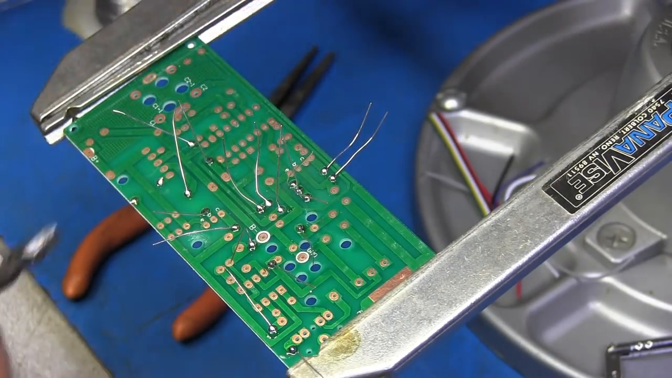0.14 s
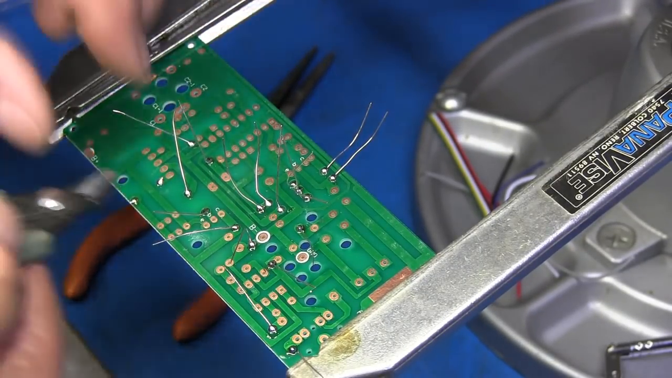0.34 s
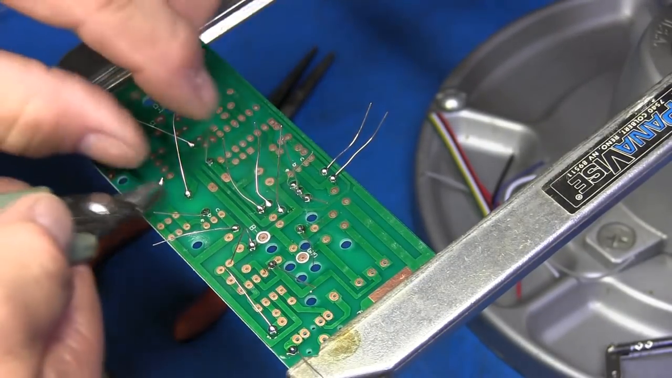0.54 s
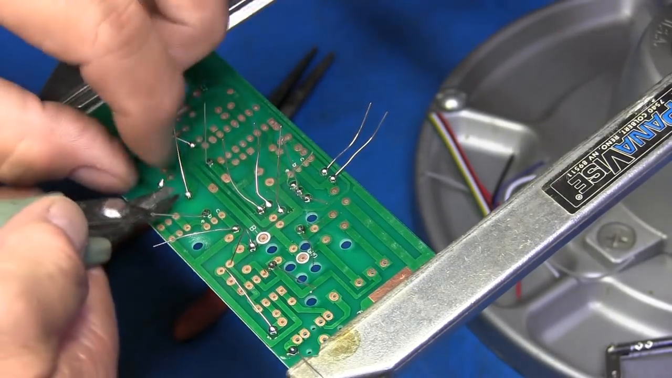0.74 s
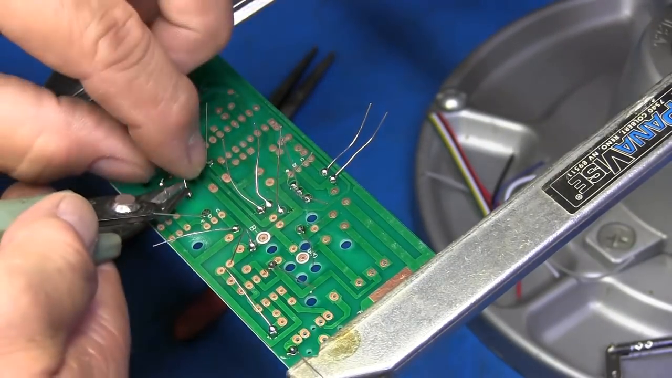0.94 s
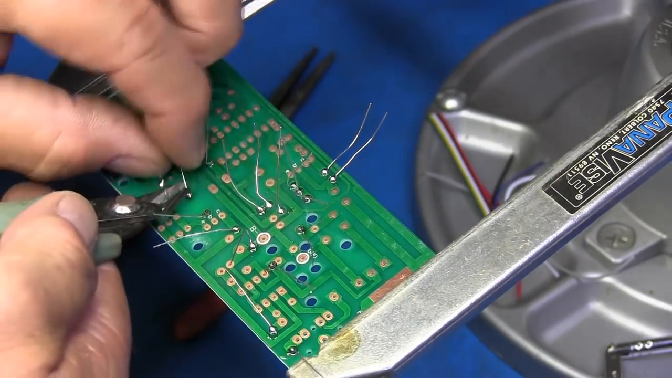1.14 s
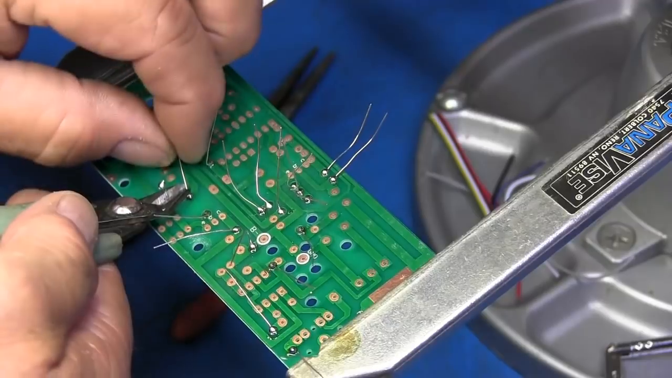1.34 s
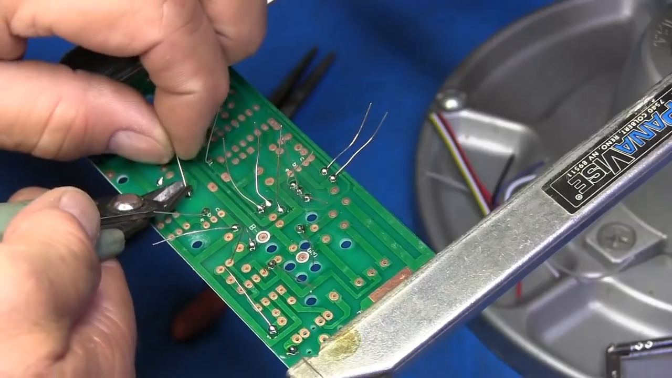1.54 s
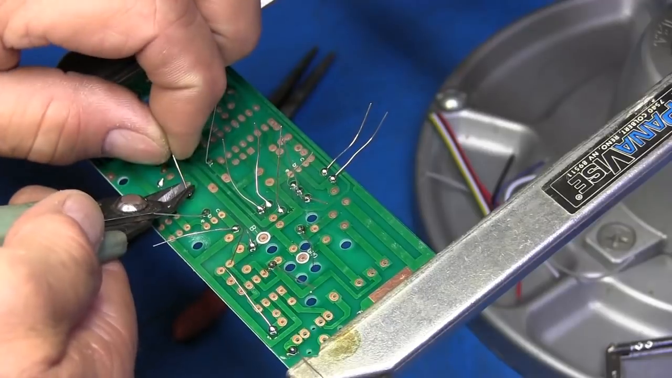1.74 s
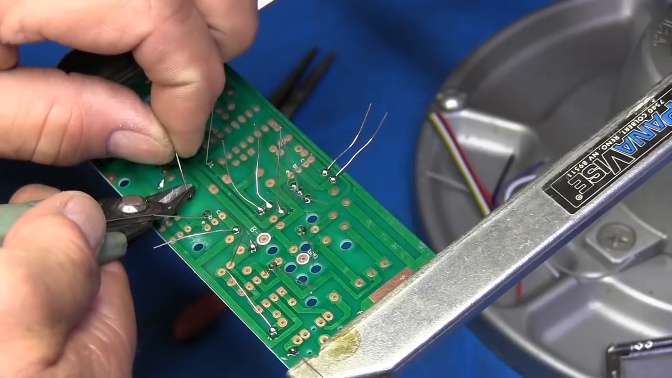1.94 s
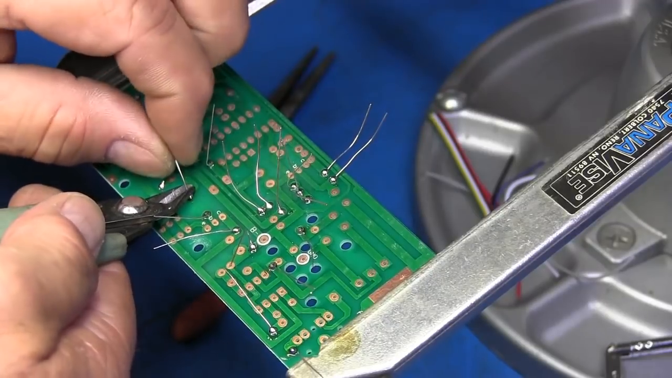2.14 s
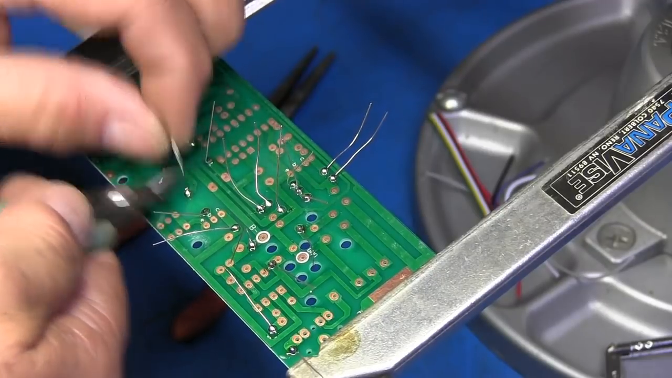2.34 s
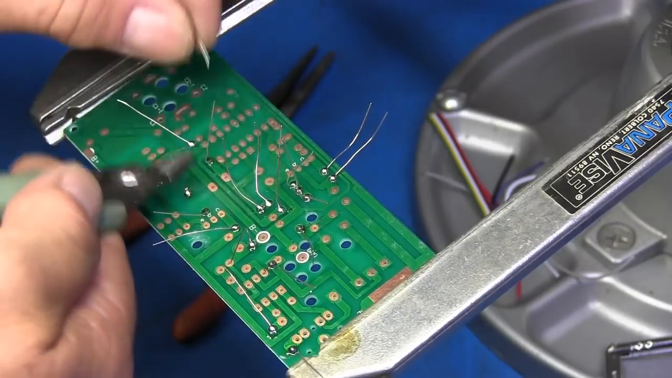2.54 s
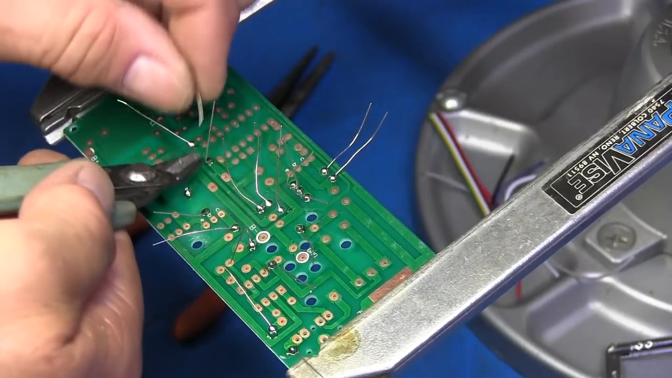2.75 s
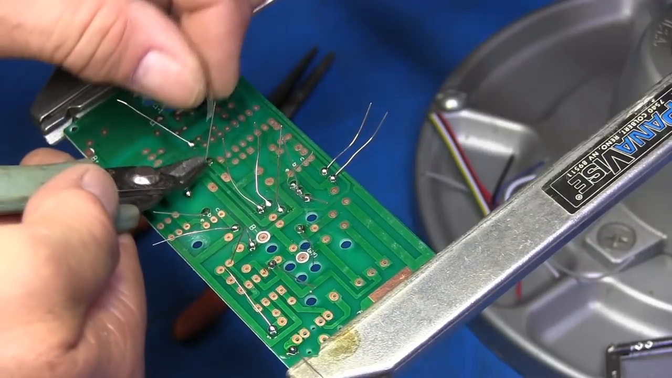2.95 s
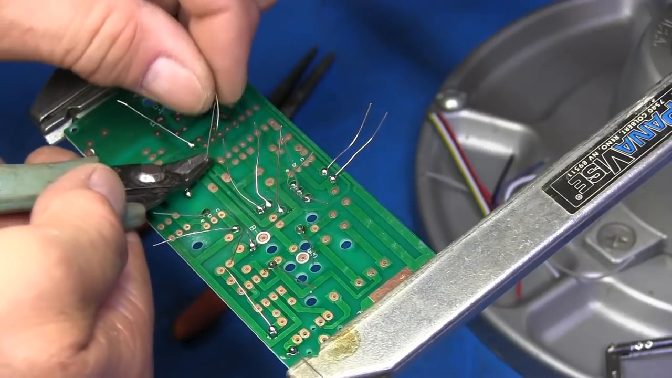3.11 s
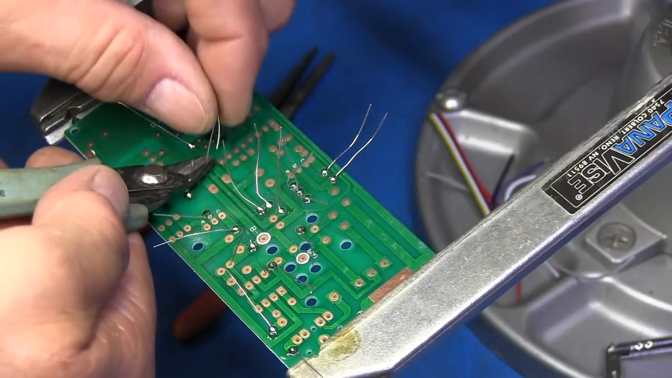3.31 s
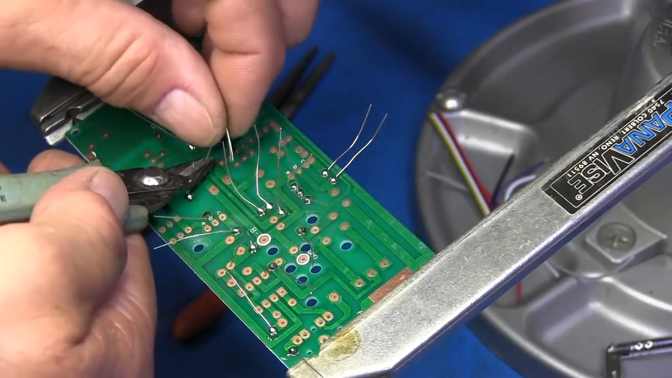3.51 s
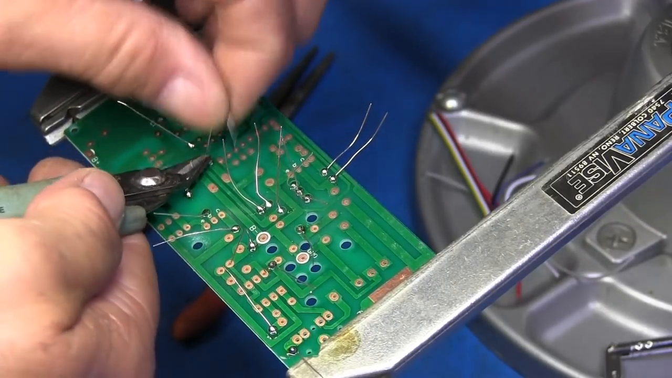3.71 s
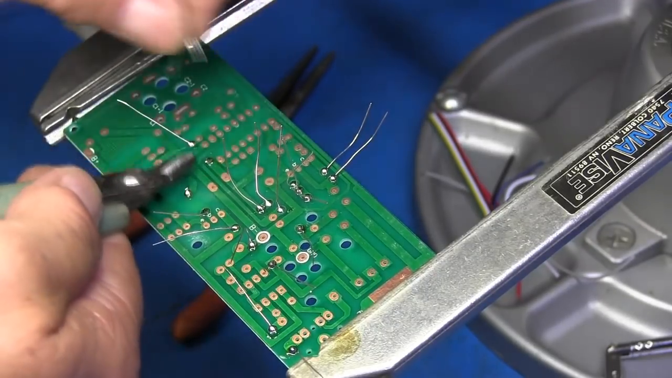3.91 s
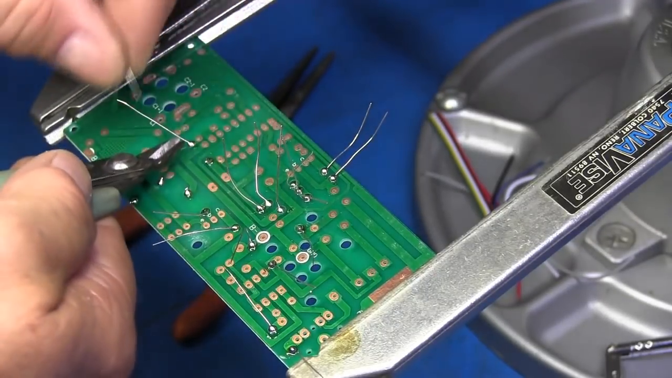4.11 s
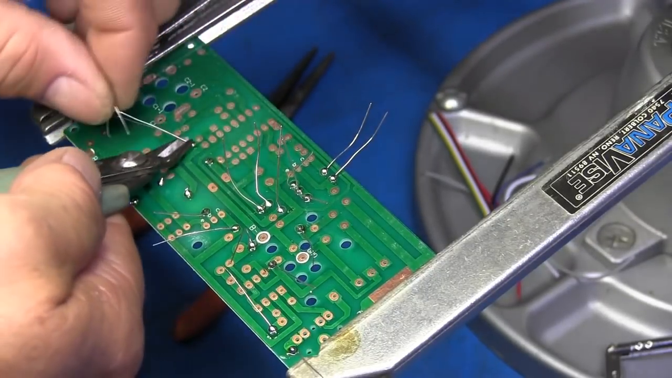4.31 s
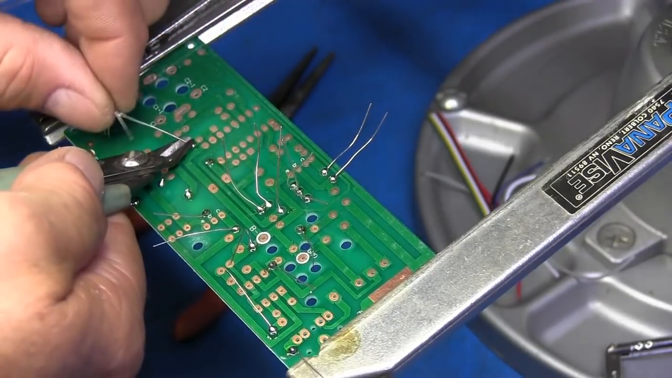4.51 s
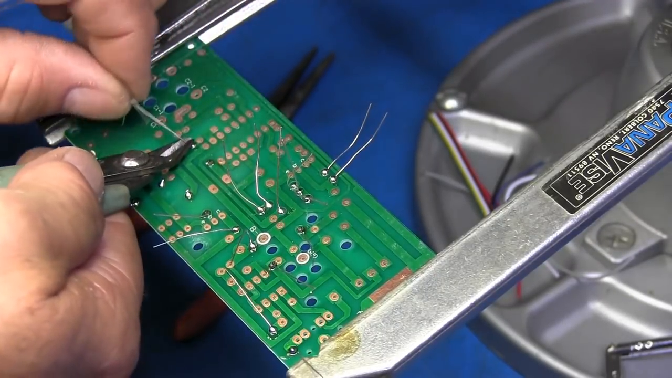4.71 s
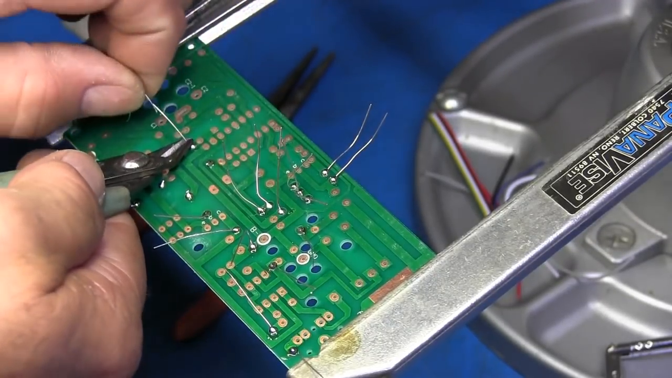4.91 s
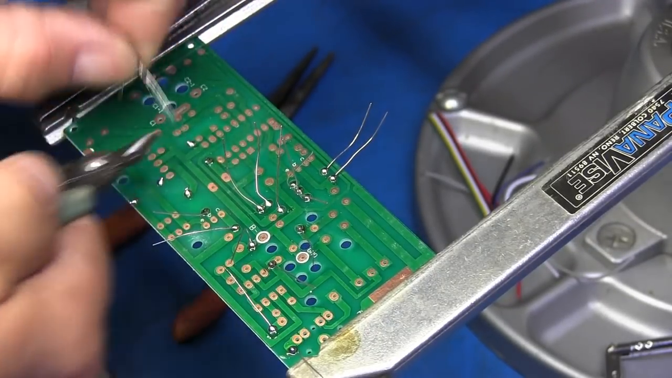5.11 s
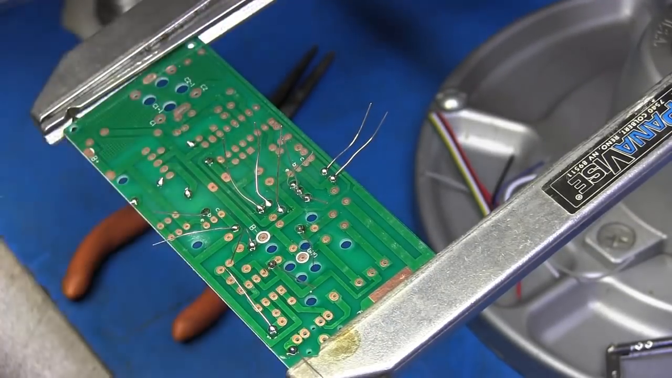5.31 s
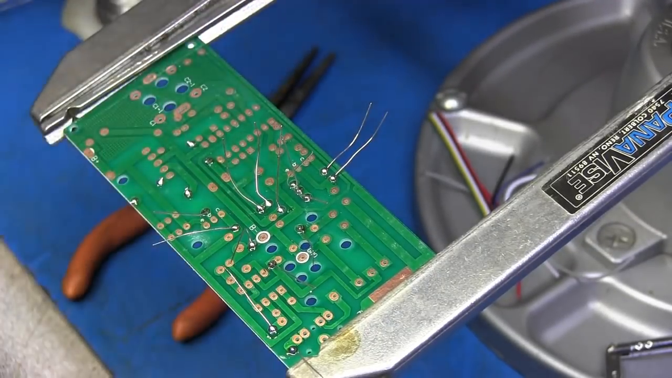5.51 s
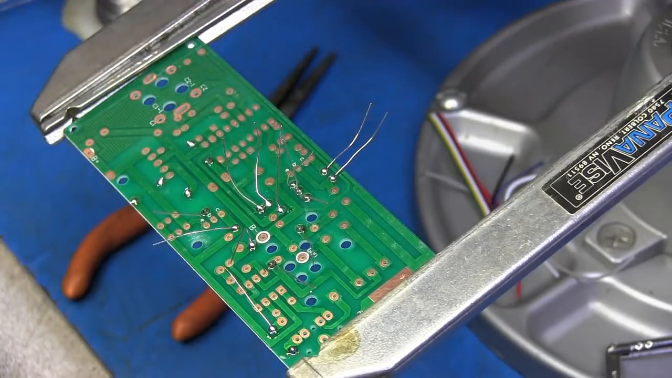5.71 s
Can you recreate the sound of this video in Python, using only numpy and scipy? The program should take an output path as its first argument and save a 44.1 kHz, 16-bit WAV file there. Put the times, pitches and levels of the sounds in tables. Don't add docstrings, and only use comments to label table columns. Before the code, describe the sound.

Small cutters tick and knock against a circuit board, then snip two wire leads with sharp metallic cracks over quiet fan air.

```python
import sys
import numpy as np
from scipy import signal
from scipy.fft import rfft, irfft
from scipy.io import wavfile

SR = 44100
rng = np.random.default_rng(int(sys.argv[2]) if len(sys.argv) > 2 else 0)


def master_out(mix):
    frames = np.transpose(np.atleast_2d(mix))
    ceiling = np.clip(frames, -1, 1)
    pcm = np.round(ceiling * 32767).astype(np.int16)
    wavfile.write(sys.argv[1], SR, pcm)


def boost_factor(decibels):
    exponent = np.asarray(decibels, float) / 20
    return 10 ** exponent


N = 258426

# pitch_hz, level_db (per Hz)
AIR = [(15, -41), (25, -21.5), (144, -9.5), (275, -4), (688, -15.5), (1310, -15), (4500, -32),
       (15700, -46.5)]
AIR_DB = -39.5
# pitch_hz, width_hz, level_db
DUCTS = [(179.5, 47, 5.5), (285, 40, 2), (307, 22, -2.5), (342, 20, 7.5), (388, 23, -3.5), (424, 37, 4),
         (552, 32, 5.5), (604, 16, 3.5), (802, 46, 5.5), (887, 42, 10.5), (946, 50, -3), (1066, 55, 5.5),
         (1234, 100, -3.5)]
# pitch_hz, likeness_0_to_1
LIKENESS = [(60, 0.7), (130, 0.98), (290, 0.92), (640, 0.73), (1410, 0.63), (3100, 0.51), (6820, 0.73),
            (15000, 0.97)]
# pitch_hz, left_minus_right_db
BALANCE = [(60, -5.5), (200, -2.0), (380, 0.5), (700, 1), (1290, -1), (2380, 0.5), (5500, -0.7),
           (15000, 3.5)]
# pitch_hz, lead_radians
PORT_LEAD = [(60, 0.099), (700, 0.22), (2000, 0.026), (6000, .05), (16000, 0.034)]
# pitch_hz, level_db (rms), width_hz, left_minus_right_db
HUM = [
    (36, -58, 0.72, -1),
    (59.3, -59, 0.61, -1),
    (118.4, -59.5, 1.1, 0),
    (872, -53, 1.1, 0),
    (895, -57, 5.3, 6),
]
# start_s, end_s, pitch_hz, level_db (rms)
WHINE = (3.52, 5.65, 13184, -76)
# time_s, level_db (rms)
CLOTH = [
    (0, -71),
    (.48, -66),
    (.62, -95),
    (5.15, -95),
    (5.27, -62),
    (5.4, -64),
    (5.55, -61),
    (5.65, -72),
    (5.72, -90),
]
# start_s, knock_db, knock_hz, wire_db, wire_hz
TICKS = [(0.502, -45, 2770, -55.5, 8070), (0.781, -50, 2410, -56, 6250), (0.9322, -43, 2500, -61, 13500),
         (1.0544, -56, 2430, -56, 6840), (1.2096, -47, 3090, -53, 7020), (1.2424, -46, 2590, -55, 8060),
         (1.4571, -45, 3080, -61, 6080), (1.481, -39.5, 3070, -53, 6600), (2.2722, -42, 3710, -54, 7730),
         (2.477, -55, 2710, -52, 7900), (2.9992, -49, 2920, -53, 8060), (3.0354, -50, 4030, -57, 6520),
         (3.262, -43.5, 4730, -61, 7050), (3.5408, -40, 5080, -53, 9000), (3.5514, -49, 2500, -52, 7460),
         (3.6726, -48, 3080, -61, 7120), (3.896, -44.5, 3310, -50, 6760), (4.4814, -52, 3060, -59, 7500),
         (4.856, -45, 3780, -52, 5100), (4.9454, -37.5, 2900, -54, 5600), (5.0475, -33, 3530, -52, 6530),
         (5.1741, -45, 3940, -52.5, 6220)]
TICK_T60_S = .075
# start_s, level_db
PINGS = [
    (0.956, -39),
    (1.9036, -55),
    (2.0443, -52),
    (3.3373, -51),
    (4.592, -46.5),
]
# pitch_hz, level_db, t60_s
SPRING = [(8400, -12, .04), (9140, -9, .04), (9900, -12, .06), (11000, 0.1, 0.056), (11700, -4, .045)]
# start_s, level_db, centre_hz, breadth_octaves, jaws_db
KNOCKS = [
    (0.8312, -35.5, 3400, 0.51, -7),
    (2.409, -50, 8400, .08, -30),
    (2.951, -38.5, 3180, .1, -30),
    (3.0095, -40.5, 4100, .3, 6),
    (3.172, -29, 2880, 0.58, -15.5),
    (4.2998, -33, 3060, 0.54, -18),
]
KNOCK_T60_S, KNOCK_PAN_DB, KNOCK_SCRAPE_DB = 0.048, -.9, -7.5
# start_s, ring_db, buildup_s, scrape_db, left_minus_right_db
LEADS = [
    (0.6404, -22.5, 0.0086, -37.5, 0),
    (4.379, -31, 0.00083, -42, -2),
]
LEAD_CONTACT = 0.95
# pitch_hz, level_db, t60_s
SLID = [(2720, -19, 0.022), (3240, -14, 0.035), (3800, -6, .045), (4110, -5.5, 0.052), (4300, -10, 0.039),
        (4490, -8.5, 0.046), (5160, -21, 0.027), (7550, -18, 0.038), (10230, -2, 0.044),
        (10670, -13, 0.071), (11700, -25, .03), (13600, -20, .03), (14500, -24, .035), (15400, -19, .03)]
# pitch_hz, level_db, t60_s
DROPPED = [(2510, -6, .07), (2720, -4, 0.09), (2860, -6, 0.054), (3070, -7, 0.11), (3300, -8, .05),
           (4480, -7, 0.045), (6760, -3, 0.035), (7500, -7, .04), (7900, -1.5, .04), (8150, -0.5, 0.1),
           (8700, -8, .07), (9200, -10, .04), (9800, -14, 0.036), (15100, -7, 0.043)]
# pitch_hz, width_hz, level_db
BOARD = [(2160, 350, 19), (2520, 180, 21), (3080, 230, 11.5), (4100, 300, 18), (4970, 300, 4),
         (5300, 350, -2), (7540, 680, 0), (8050, 680, 0), (9250, 650, 0), (10900, 700, -12),
         (12200, 700, 4)]
# pitch_hz, level_db, t60_s
VISE = [(1900, -17, 0.092), (2157, -6, 0.082), (2380, -15, 0.05), (2530, -10, .055), (2900, -12, 0.055),
        (3097, -11, 0.14), (3400, -10, 0.027), (3780, -15, .045), (3910, -12, 0.042), (4340, -4, 0.05),
        (4730, -1, 0.033), (5080, -6, .045), (5500, -11, 0.037), (5800, -15, .04)]
# pitch_hz, level_db, t60_s
JAWS = [(6280, -18, .05), (7230, -7, 0.092), (7450, -5.5, 0.04), (8300, -6, .07), (8830, -7, 0.076),
        (8930, -7, .05), (9740, -5, .05), (11200, -6, .06), (11750, -16, 0.061), (12070, -22, .07),
        (13000, -12, .07), (14200, -10, .055), (14100, -25, .055), (15300, -26, .06)]
# pitch_hz, level_db
RATTLE = [(760, -26), (1300, -14), (2180, -10), (3100, -1.5), (4400, -6), (9500, -7.5), (15000, -11),
          (16500, -48)]
# start_s, crack_db, ring_db, rattle_db, rattle_t60_s
SNIPS = [
    (2.3161, -4.5, -12.5, -21.5, 0.044),
    (3.7302, 1, -11.5, -22.5, 0.13),
]
SNIP_PAN_DB, RING_T60_SHARE = .4, 1
CRACK_HZ, CRACK_HZ_PER_DB = 4630, 65
BRIGHT_DB_PER_OCTAVE = .8
ROOM_DB, ROOM_T60_S, ROOM_TREBLE_T60_S = -9, 0.17, 0.16
HISS_EDGE_HZ, BAND_EDGE_HZ = 15850, 16350
CEILING = 1.02


def evened(x):
    return x / np.sqrt(np.mean(x ** 2) + 1e-20)


def read(points, hz):
    f, value = np.transpose(points)
    return np.interp(np.log(hz + 1), np.log(f + 1), value)


def add(mix, s, sound, pan_db):
    part = mix[:, round(s * SR):][:, :sound.shape[-1]]
    part += boost_factor(np.array([[pan_db / 2], [-pan_db / 2]])) * sound[..., :part.shape[1]]


def coloured(x, gain):
    size = x.shape[-1]
    return irfft(rfft(x) * gain(np.fft.rfftfreq(size, 1 / SR)), size)


def hump(hz, centre_hz, octaves):
    return np.exp(-.5 * (np.log2((hz + 1) / centre_hz) / octaves) ** 2)


def resonances(table, hz):
    return sum(db / (1 + (2 * (hz - f) / width) ** 2) for f, width, db in table)


def board(hz):
    return boost_factor(resonances(BOARD, hz))


def spread(hz):
    return hump(hz, 5000, 1.0)


def weighted(modes, gain):
    return [(hz, db + 20 * np.log10(gain(hz) + 1e-9), t60) for hz, db, t60 in modes]


def ring(modes, blur_hz, apart, longest=.13, size=8192):
    hz, db, t60 = np.transpose(modes)[:, :, None]
    t, sound = np.arange(size) / SR, 0
    decay = boost_factor(db - 60 * t / np.clip(t60, .01, longest))
    for share in (1, .45, .35):
        shift, start, lead = rng.uniform(-1.03, 1, (3, 1) + hz.shape)
        near_hz = hz + (share < 1) * blur_hz * shift
        turn = 2 * np.pi * near_hz * t + np.pi * start
        ports = turn + apart * spread(hz) * lead * np.array([.5, -.5])[:, None, None]
        sound = sound + share * (decay * np.sin(ports)).sum(1)
    return sound / abs(sound).max()


def rattle(gain, t60, wide=0.27, rise=0.00012, size=8192):
    t = np.arange(size) / SR
    mid, side = rng.standard_normal((2, size))
    side = wide * coloured(side, spread)
    noise = evened(coloured(np.array([mid + side, mid - side]), gain))
    return noise * (1 - np.exp(-t / rise)) * boost_factor(-60 * t / np.clip(t60, .002, .4))


def workshop_air():
    hz = np.fft.rfftfreq(N, 1 / SR)
    level_db = read(AIR, hz) + resonances(DUCTS, hz)
    level_db -= 12 * np.maximum(np.log2(28 / (hz + 1)), 0)
    level_db -= 60 * (hz > HISS_EDGE_HZ)
    left, other = rfft(rng.standard_normal((2, N)))
    same = np.clip(read(LIKENESS, hz), 0, 1)
    right = same * left + np.sqrt(1 - same ** 2) * other
    right = right * np.exp(-1j * read(PORT_LEAD, hz))
    lean_db = read(BALANCE, hz) / 2
    air = irfft(np.array([left * boost_factor(level_db + lean_db), right * boost_factor(level_db - lean_db)]), N)
    t, swell = np.arange(N) / SR, 0
    for f in np.geomspace(.2, 5, num=16):
        swell = swell + np.sin(2 * np.pi * (f * t + rng.random())) / np.sqrt(f)
    return boost_factor(AIR_DB + 0.077 * evened(swell)) * evened(air)


def hum():
    out, t, slow_hz = np.zeros((2, N)), np.arange(N) / SR, np.fft.fftfreq(N, 1 / SR)
    for hz, db, width, pan_db in HUM:
        a, b = rng.standard_normal((2, N))
        wander = np.fft.ifft((a + 1j * b) / (1 + (2 * slow_hz / width) ** 2))
        steady = 1.9 / width
        tone = ((steady + wander / np.std(wander)) * np.exp(2j * np.pi * hz * t)).real
        add(out, 0, boost_factor(db) * evened(tone), pan_db)
    return out


def whine():
    start, end, hz, db = WHINE
    t = np.arange(N) / SR
    on = np.clip(np.minimum(t - start, end - t) / .03, 0, 1)
    return boost_factor(db) * np.sqrt(2) * on * np.sin(2 * np.pi * hz * t)


def sleeve():
    s, db = np.transpose(CLOTH)
    t = np.arange(N) / SR
    hiss = coloured(rng.standard_normal(N), lambda hz: hump(hz, 8500, 0.72) * (hz < HISS_EDGE_HZ))
    return boost_factor(np.interp(t, s, db, -140, -140)) * evened(hiss)


def spring_pings():
    out = np.zeros((2, N))
    for s, db in PINGS:
        edge = rattle(lambda f: hump(f, 9600, 0.28), 0.044)
        ping = ring(SPRING, blur_hz=200, apart=0.83) + 0.5 * edge
        add(out, s + .0008, boost_factor(db - 0.5) * ping, .3)
    return out


def jaw_ticks():
    out = np.zeros((2, N))
    for s, knock_db, knock_hz, wire_db, wire_hz in TICKS:
        for db, hz, octaves in ((knock_db - 10.5, knock_hz, .6), (wire_db - 5.5, wire_hz, .4)):
            gain = lambda f: hump(f, hz, octaves) * board(f) ** 0.74
            buzz = rattle(gain, TICK_T60_S)
            contact = rattle(gain, 0.0079)
            add(out, s + 0.001043, boost_factor(db) * (buzz + 5.0 * contact), -.4)
    return out


def knocks():
    out = np.zeros((2, N))
    for s, db, hz, octaves, jaws_db in KNOCKS:
        low_cut = lambda f: hump(np.minimum(f, 1900), 1900, .3)
        place = lambda f: hump(f, hz, octaves) * low_cut(f) + boost_factor(jaws_db) * hump(f, 10300, 0.3)
        knock = ring(weighted(VISE + JAWS, place), blur_hz=100, apart=.9, longest=0.082, size=4096)
        scrape = rattle(lambda f: board(f) ** .6 * place(f), KNOCK_T60_S)
        scrape = scrape + 4.5 * rattle(place, .003, rise=.00005)
        add(out, s, boost_factor(db) * knock, KNOCK_PAN_DB)
        add(out, s, boost_factor(db + KNOCK_SCRAPE_DB) * scrape, KNOCK_PAN_DB)
    return out


def loose_leads():
    out, t = np.zeros((2, N)), np.arange(8192) / SR
    for (s, ring_db, rise, scrape_db, pan_db), modes, hz in zip(LEADS, (SLID, DROPPED), (10000, 5600)):
        build_db = -9 + 18 * np.minimum(t / rise, 1)
        clink = ring(modes, blur_hz=120, apart=.9) * boost_factor(build_db)
        place = lambda f: hump(f, hz, 0.95)
        scrape = rattle(lambda f: board(f) ** 0.54 * place(f), 0.064)
        scrape = scrape + LEAD_CONTACT * rattle(place, 0.0037)
        add(out, s, boost_factor(ring_db) * clink + boost_factor(scrape_db) * scrape, pan_db)
    return out


def wire_crack(hz):
    t = np.arange(8192) / SR
    turns = hz * (t + .00006 * (1 - np.exp(-t / .00006)))
    crack = np.sin(2 * np.pi * turns) * boost_factor(-60 * t / .0021)
    for ratio, share in ((.55, 0.16), (.73, 0.16), (1.5, .3), (1.95, .22)):
        crack += share * np.sin(2 * np.pi * ratio * hz * t) * boost_factor(-60 * t / 0.0064)
    crack = crack * (1 - np.exp(-t / .00004))
    return signal.lfilter(*signal.butter(2, [1750, 14500], "band", fs=SR), crack)


def snips():
    out, t = np.zeros((2, N)), np.arange(8192) / SR
    for s, crack_db, ring_db, rattle_db, t60 in SNIPS:
        bright = lambda f: boost_factor(BRIGHT_DB_PER_OCTAVE * crack_db * np.maximum(np.log2((f + 1) / 4800), 0))
        gain = lambda f: boost_factor(read(RATTLE, f)) * bright(f)
        crack = wire_crack(CRACK_HZ + CRACK_HZ_PER_DB * crack_db)
        clap = .2 * rattle(gain, .014, .6, .0006)
        shake = rattle(lambda f: gain(f) * board(f) ** 0.38, t60, 0.28, 0.00021)
        shake = coloured(shake, lambda f: f < HISS_EDGE_HZ)
        longest = 0.034 + RING_T60_SHARE * t60 / 2
        steel = ring(weighted(VISE + JAWS, bright), blur_hz=170, apart=1.4, longest=longest)
        steel = steel * (1 - np.exp(-t / 0.00025))
        snip = boost_factor(crack_db) * (crack + clap) + boost_factor(ring_db) * steel + boost_factor(rattle_db) * shake
        add(out, s, snip, SNIP_PAN_DB)
    return out


def room(x):
    size = SR // 2
    places = np.arange(60, size - 20, 20)
    shape = (2, len(places))
    taps = np.zeros((2, size))
    np.put_along_axis(taps, places + rng.integers(0, 20, shape), rng.choice([-1., 1.], shape), 1)
    side = 0.53 * coloured(taps[1], spread)
    taps = np.array([taps[0] + side, taps[0] - side])
    low = signal.lfilter(*signal.butter(2, 5000, fs=SR), taps)
    t = np.arange(size) / SR
    taps = coloured(taps, lambda f: f < HISS_EDGE_HZ)
    tail = low * boost_factor(-60 * t / ROOM_T60_S) + (taps - low) * boost_factor(-60 * t / ROOM_TREBLE_T60_S)
    tail = tail / np.linalg.norm(tail, axis=1, keepdims=True)
    return signal.fftconvolve(x.mean(0)[None], tail, axes=1)[:, :N]


def scene():
    background = workshop_air() + hum() + whine() + sleeve()
    small_metal = spring_pings() + jaw_ticks() + knocks() + loose_leads()
    work = coloured(small_metal, lambda f: f < HISS_EDGE_HZ) + snips()
    return background + work + boost_factor(ROOM_DB) * room(work)


def top_cut(x):
    return signal.sosfilt(signal.butter(12, 16860, fs=SR, output="sos"), x)


def record(dry):
    rounded = dry / (1 + (abs(dry) / CEILING) ** 6) ** (1 / 6)
    low_pass = signal.firwin(255, BAND_EDGE_HZ, window=("kaiser", 8), fs=SR)
    mix = signal.oaconvolve(rounded, low_pass[None], "same")
    return top_cut(mix)


dry = scene()
out = record(dry)
master_out(out)
```